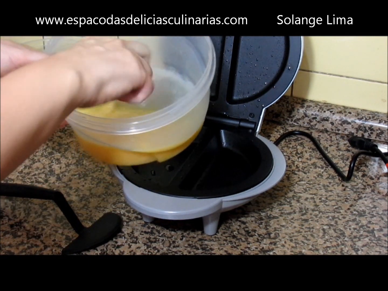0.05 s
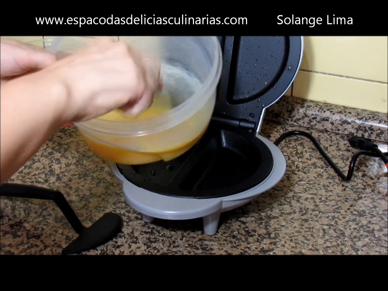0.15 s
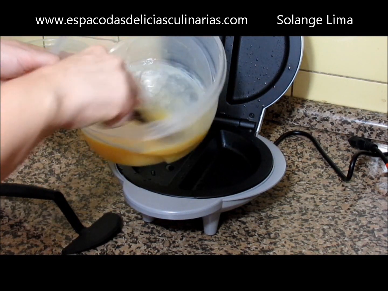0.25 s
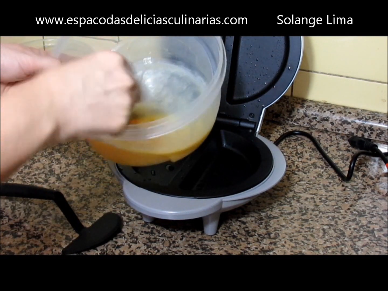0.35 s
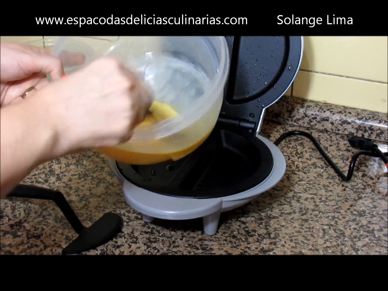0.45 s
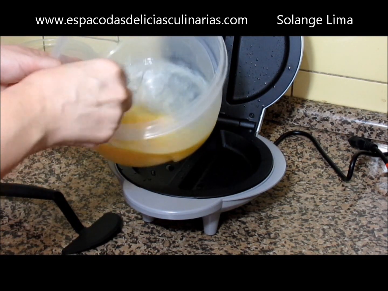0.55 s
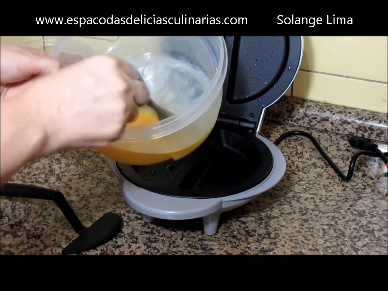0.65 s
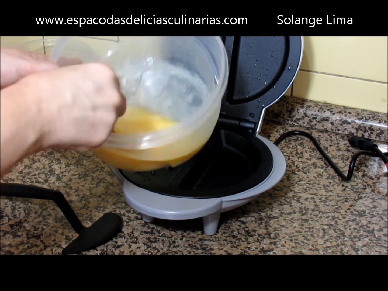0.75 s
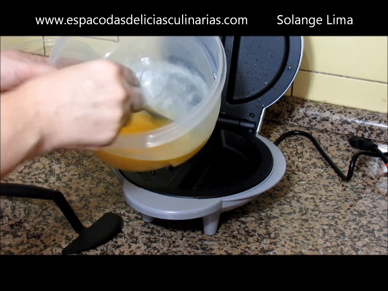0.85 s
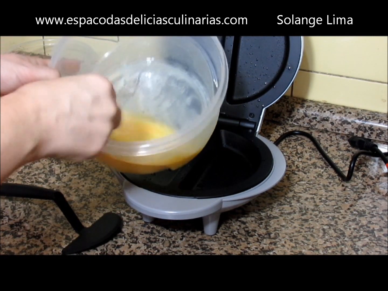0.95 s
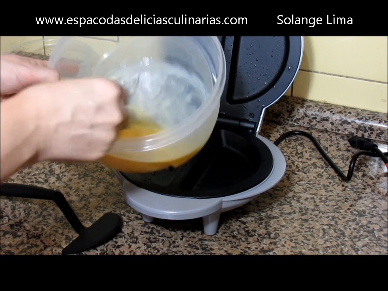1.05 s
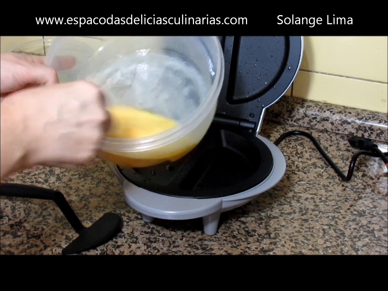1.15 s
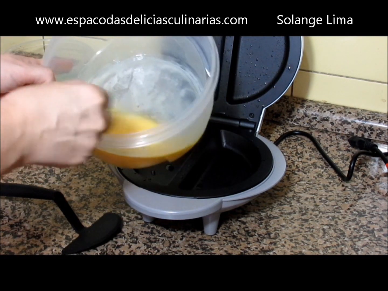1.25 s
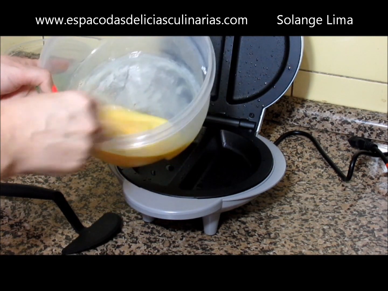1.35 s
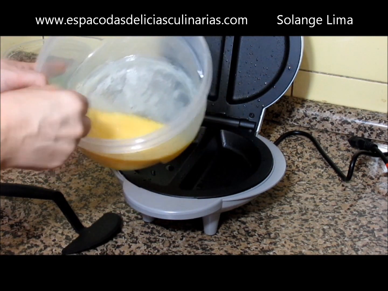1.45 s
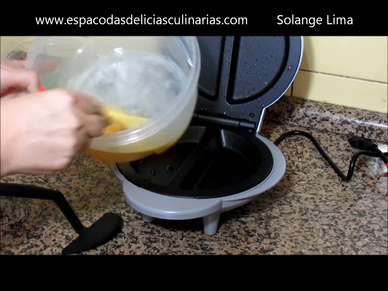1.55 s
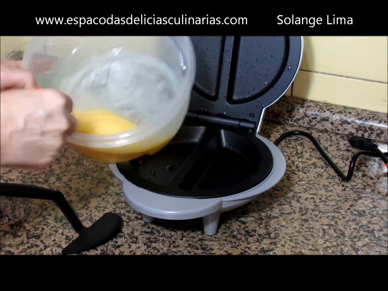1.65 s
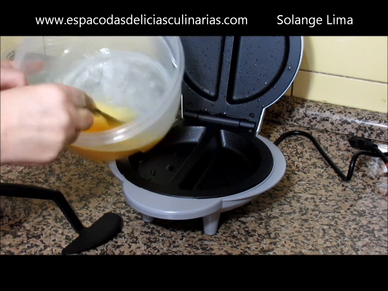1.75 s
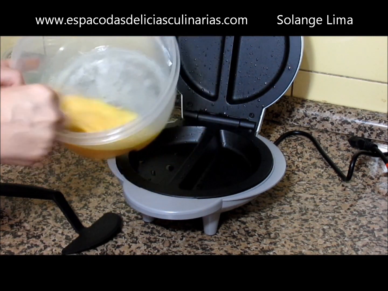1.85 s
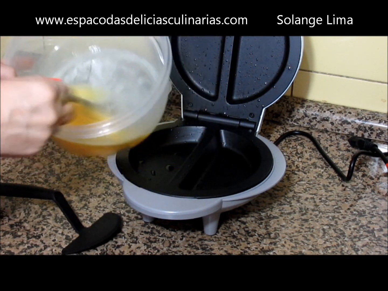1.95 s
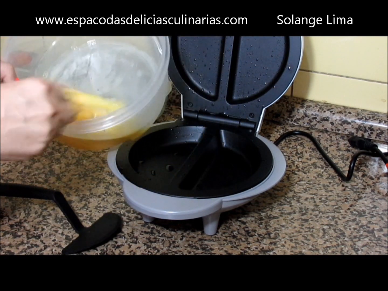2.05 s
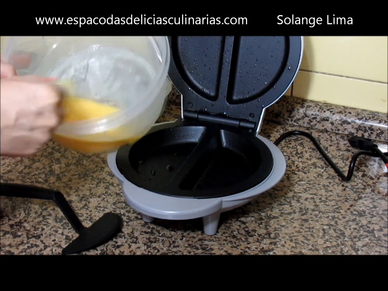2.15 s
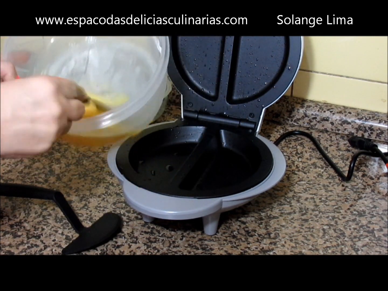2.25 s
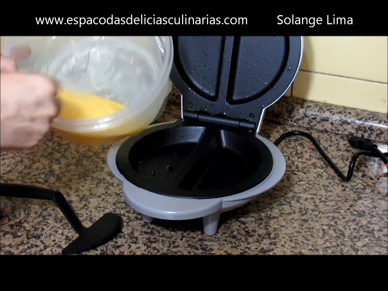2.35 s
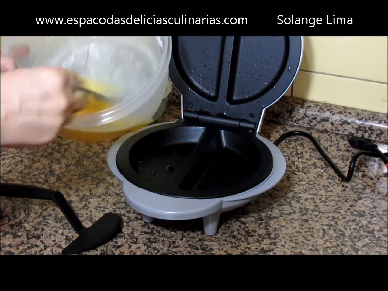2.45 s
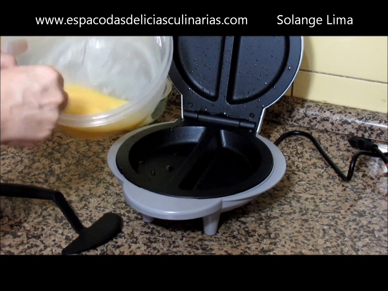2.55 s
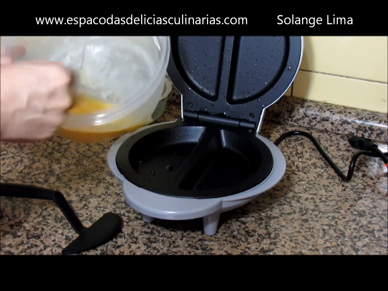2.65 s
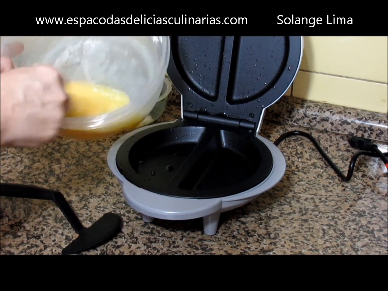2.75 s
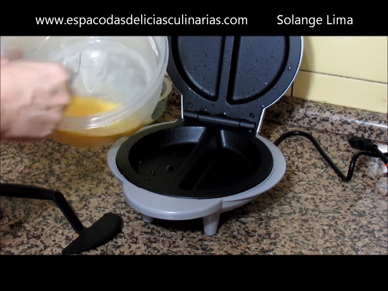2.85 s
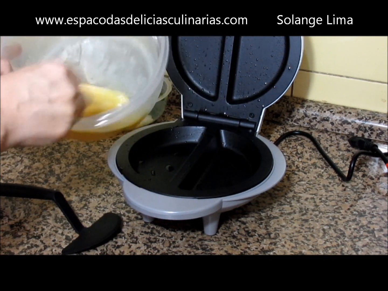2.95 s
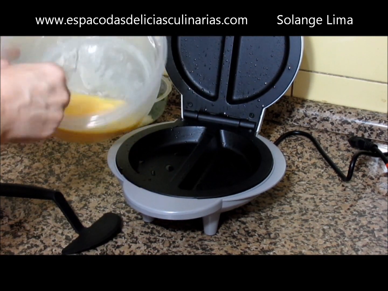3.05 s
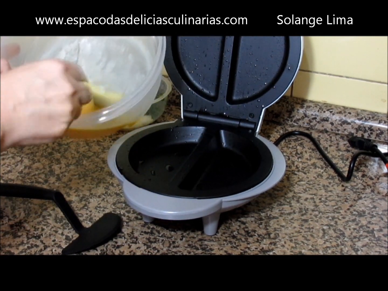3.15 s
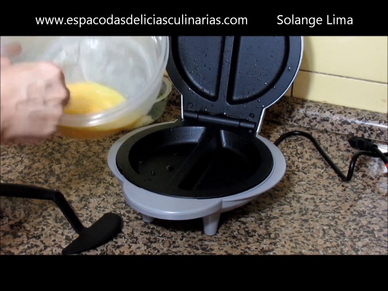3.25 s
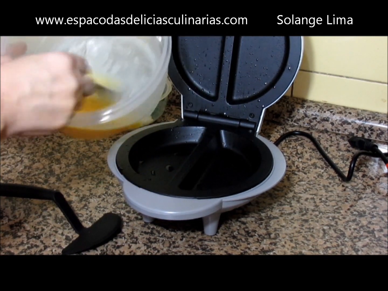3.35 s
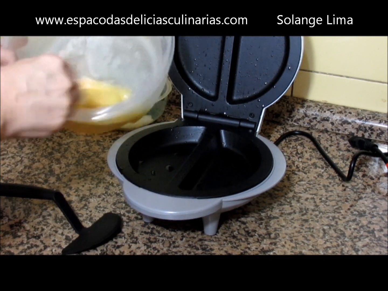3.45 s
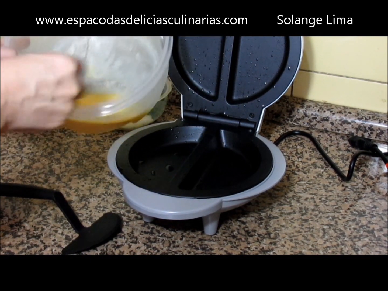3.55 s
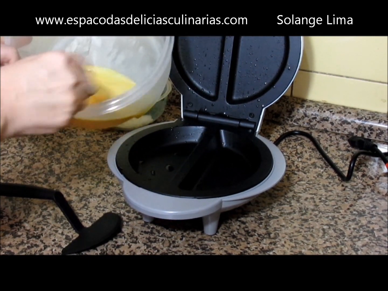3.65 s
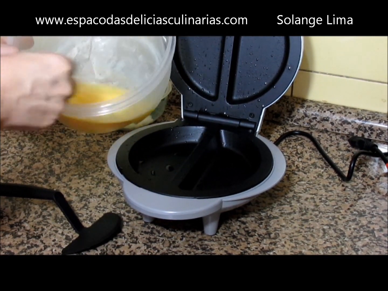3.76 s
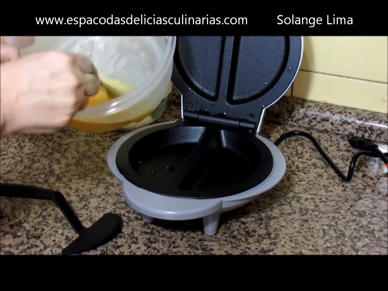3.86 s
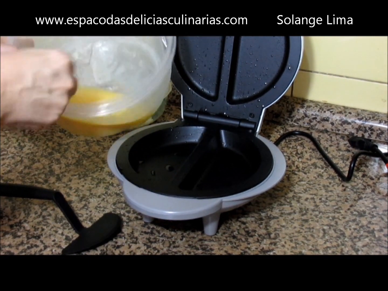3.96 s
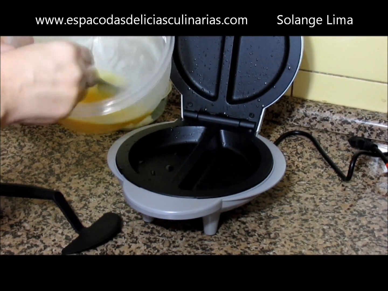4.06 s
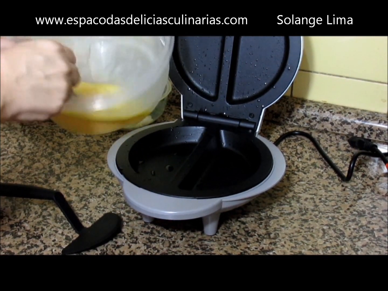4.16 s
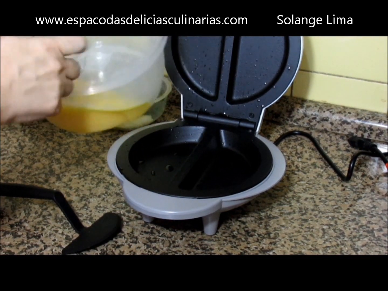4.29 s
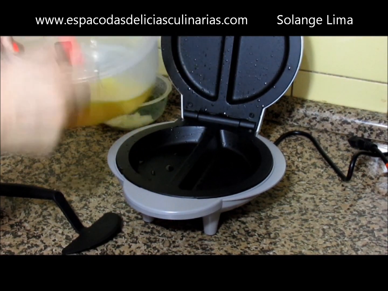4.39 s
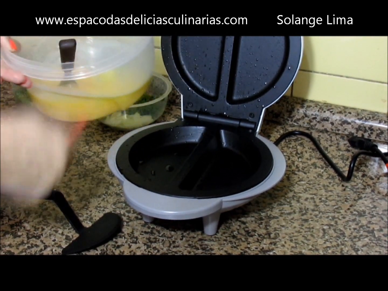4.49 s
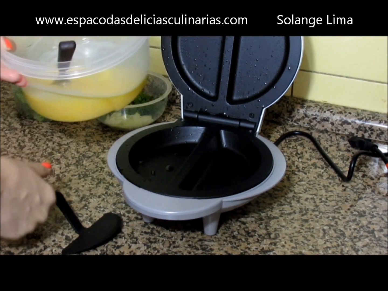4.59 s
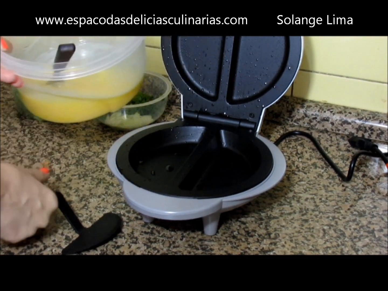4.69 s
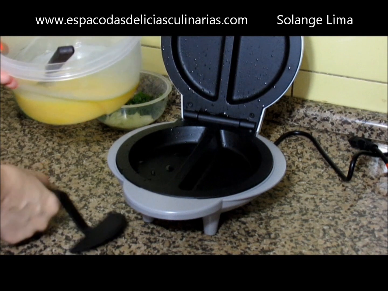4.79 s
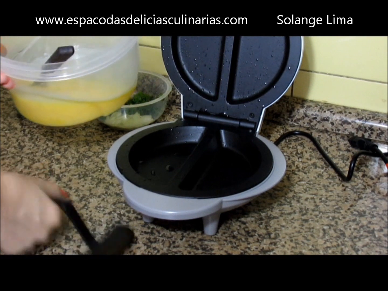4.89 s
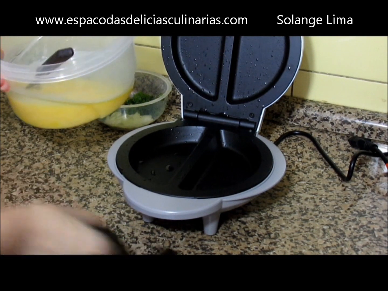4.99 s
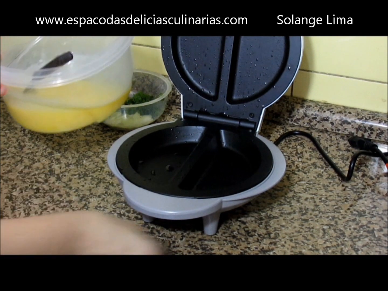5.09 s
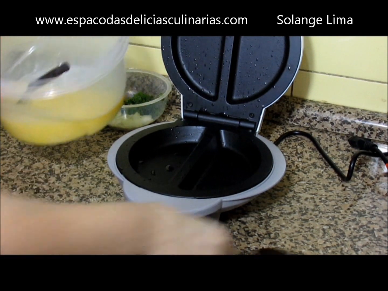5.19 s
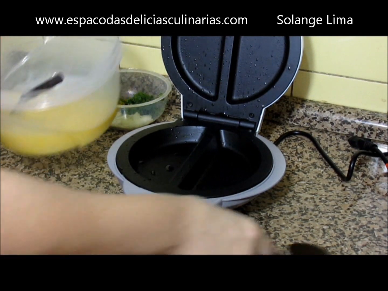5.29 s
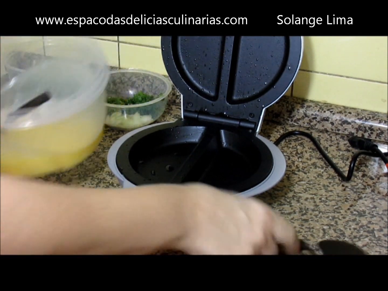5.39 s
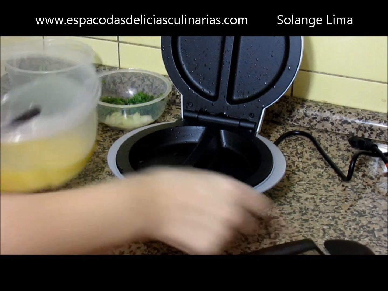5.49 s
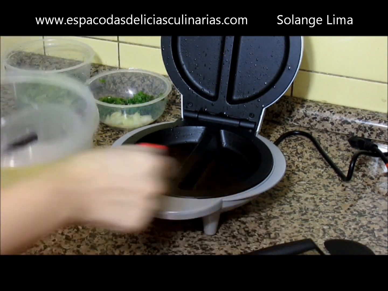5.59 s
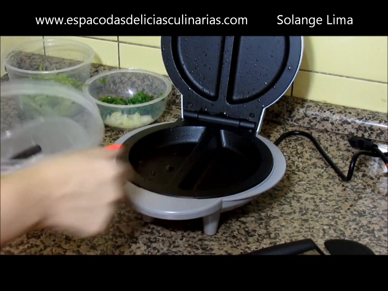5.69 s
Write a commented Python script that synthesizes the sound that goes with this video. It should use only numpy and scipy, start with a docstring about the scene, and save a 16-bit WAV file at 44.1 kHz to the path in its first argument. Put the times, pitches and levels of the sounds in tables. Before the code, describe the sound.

Fast, wet egg whisking against a plastic bowl in an echoing kitchen stops, followed by scrapes and hard knocks of a kitchen turner.

```python
"""In a hard-walled kitchen, close to the camera, a spoon beats raw eggs in a thin plastic bowl.
Each stroke splashes into the egg (shaped noise and sharp drops), slaps it and knocks the wall (ringing modes);
egg swirls and clucks between blows. Later a turner is picked up, dragged over the stone counter and laid down:
rattles, ringing modes and grainy noise. Echoes and standing waves follow every blow, over the quiet of the room."""
import sys
import numpy as np
from scipy import signal
from scipy.fft import rfft, irfft, next_fast_len
from scipy.io import wavfile
from scipy.ndimage import uniform_filter1d

SR = 44100
rng = np.random.default_rng(int(sys.argv[2]) if len(sys.argv) > 2 else 0)


def unload_audio(sound):
    """Save the sound as a 16-bit wav file, at the path given as the first command line argument."""
    columns = np.transpose(np.atleast_2d(sound))
    # keep every value between -1 and 1, then stretch to whole-number steps
    steps = np.round(np.clip(columns, -1, 1) * 32767)
    wavfile.write(sys.argv[1], SR, steps.astype(np.int16))


N = 252693
SIZE = next_fast_len(N + SR)  # room for the scene and a second of echoes
HZ = np.fft.rfftfreq(SIZE, 1 / SR)
# Levels of sounds on the counter are source levels, before the path to the microphone.


def gain_of(db):
    """Amplitude factor of a level in dB."""
    return 10 ** (np.asarray(db) / 20)


def evened(x):
    """Scales x to an RMS of one."""
    return x / np.sqrt(np.mean(x ** 2) + 1e-20)


def read(points, hz):
    """Reads a curve of (pitch_hz, value) rows, straight between points on a log pitch scale."""
    point_hz, value = np.transpose(points)
    return np.interp(np.log(hz + 1), np.log(point_hz + 1), value)


def level(curve):
    """Gain over time from (start_s, level_db) rows, silent outside them."""
    s, db = np.transpose(curve)
    return gain_of(np.interp(np.arange(N) / SR, s, db, left=-120, right=-120))


def add(mix, s, sound):
    """Lays a sound into the mix at s seconds, cut at the end of the mix."""
    part = mix[round(s * SR):][:len(sound)]
    part += sound[:len(part)]


def coloured(x, db):
    """Gives x the spectrum db(hz) through a causal, minimum-phase filter."""
    log_gain = np.maximum(db(abs(np.fft.fftfreq(4096, 1 / SR))), -100) * np.log(10) / 20
    taps = np.fft.ifft(np.exp(np.conj(signal.hilbert(log_gain)))).real[:2048]
    return signal.oaconvolve(x, taps)[:len(x)]


def burst(length_s, rise_s=0.0004):
    """A dying rattle of tiny contacts, spread evenly over all pitches; the shape is applied one and a half times."""
    t = np.arange(4096) / SR
    noise, unevenness = rng.standard_normal((2, len(t)))
    shape = (1 - np.exp(-t / rise_s)) * np.exp(-t / length_s)
    spectrum = rfft(noise * np.exp(0.72 * unevenness) * shape)
    even = irfft(spectrum / np.sqrt(uniform_filter1d(abs(spectrum) ** 2, size=9)))
    return even * np.sqrt(shape + 1e-9)


def peaked(x, db):
    """Sets the RMS of the loudest 6 ms to db."""
    return gain_of(db) * x / np.sqrt(np.max(uniform_filter1d(x ** 2, size=256)))


def grains(per_s, spread_db):
    """Noise broken into short grains of uneven size."""
    starts = rng.random(N) < per_s / SR
    size = gain_of(spread_db * np.minimum(rng.exponential(1, N), 4)) * starts
    return evened(rng.standard_normal(N) * (0.99 + signal.lfilter([1], [1, -.99], size)))


def swell(start, end, rise_s, db, fade_db_per_s):
    """Gain that rises quickly at start, fades steadily and stops at end."""
    t = np.arange(N) / SR
    edges = np.clip((t - start) / rise_s, 0, 1) ** 2 * np.clip((end - t) / rise_s, 0, 1)
    return edges * gain_of(db - fade_db_per_s * np.maximum(t - start - rise_s, 0))


# left-right likeness of diffuse sound: pitch_hz, likeness (1 same, 0 unrelated, -1 opposite)
DIFFUSE_SAME = [(25, -0.9), (60, -0.93), (130, -0.85), (290, -0.28), (640, -0.38), (1410, -0.23),
                (3100, 0.92), (6820, 0.95), (15000, -0.2)]
# left-right balance of diffuse sound: pitch_hz, left_minus_right_db
DIFFUSE_BALANCE = [(60, -1), (380, 4.5), (1300, 1.5), (5000, 0)]


def diffuse(a, b, likeness=DIFFUSE_SAME):
    """Blends two unrelated spectra into the pair that the microphone ports hear."""
    same = np.clip(read(likeness, HZ), -1, 1)
    half = gain_of(read(DIFFUSE_BALANCE, HZ) / 2)
    return np.array([a * half, (same * a + np.sqrt(1 - same ** 2) * b) / half])


# spectrum of the quiet room: pitch_hz, level_db (per Hz, relative)
AIR_COLOUR = [(12, -42), (20, -10.5), (50, -6), (91, -13), (123, -5), (146, -9), (187, -5), (301, -13),
              (328, -0.5), (357, -9.5), (399, -8.5), (434, -9.5), (759, -17), (1090, -17), (3160, -35.5),
              (16000, -34.5)]
AIR_DB = -44


def room_air():
    """The quiet of the room: steady diffuse noise in the colour of the room."""
    pair = diffuse(*rfft(rng.standard_normal((2, SIZE))))
    air = irfft(pair * gain_of(read(AIR_COLOUR, HZ)), SIZE)[:, :N]
    return gain_of(AIR_DB) * evened(air)


# the kitchen still rings from an earlier blow: pitch_hz, level_db (before the side gains), t60_s
RINGING = [(295, -41.5, 1.9), (338, -44, .6), (443, -49, 0.86), (492, -48, 1.3), (630, -59, .8),
           (825, -54, 0.93)]


def ringing():
    """Dying standing waves, each a decaying sine, stronger on the left."""
    t, tones = np.arange(N) / SR, 0
    for hz, db, t60 in RINGING:
        tones = tones + gain_of(db - 60 * t / t60) * np.sin(2 * np.pi * (hz * t + rng.random()))
    return tones * gain_of([[4.], [-1.5]])  # left, right dB


# egg swirling round the bowl between blows: start_s, level_db
SWIRL = [(0.0, -44), (0.14, -50.5), (0.3, -73), (0.51, -71), (0.62, -51.5), (1.43, -50), (1.76, -43),
         (2.02, -43), (2.09, -44.5), (3.55, -47.5), (4.29, -49), (4.4, -65)]
# spectrum of the swirl: pitch_hz, level_db (per Hz, relative)
SWIRL_COLOUR = [(47, -67), (80, -14.5), (304, -13), (451, -9.5), (587, 0.5), (669, -16), (1290, -6),
                (2330, -15.5), (15000, -38.5)]


def swirl():
    """Egg running round the bowl: coloured grains of noise that swell and sink."""
    return level(SWIRL) * evened(coloured(grains(300, 5.4), lambda hz: read(SWIRL_COLOUR, hz)))


BLOW_RISE_S = 0.002998
THUD_DB, HOLLOW_THUD_DB = 6.5, -2  # beside the sum of the ringing modes
THUD_CYCLES, THUD_LAG_CYCLES, HOLLOW_LAG_CYCLES = 0.59, 1.446, 1.737
CONTACTS_PER_S, CONTACTS_S = 1000, 0.014  # chatter rate and its decay time


def thud(t, hz, lag_cycles, db):
    """The wall dents once under the push and springs back: a cosine in a short bell envelope."""
    turns = hz * t - lag_cycles
    return gain_of(db) * np.cos(2 * np.pi * turns) * np.exp(-(turns / THUD_CYCLES) ** 2)


def chatter(t, rise):
    """The spoon edge chatters on the wet wall: random pulses and one firm contact."""
    chance, size = rng.random((2, len(t)))
    contacts = (chance < CONTACTS_PER_S / SR) * (2 * size - 1) * np.exp(-t / CONTACTS_S) * rise
    contacts[round(BLOW_RISE_S * SR)] += .45
    return contacts


# modes of the bowl: part (0 body, 1 hollow, 2 wall), pitch_hz and level_db (both nominal, shifted at each blow), t60_s
BOWL = [(0, 175, 0, 0.028), (0, 212, -2, 0.021), (0, 297, -2.5, 0.015), (0, 380, 4, 0.032),
        (0, 480, 3, 0.043), (1, 634, 0.5, 0.033), (1, 1453, -18, 0.034), (2, 860, -3, 0.0049),
        (2, 1006, 2, 0.0097), (2, 1296, -1.5, .011), (2, 1482, -1, 0.014), (2, 1780, -2.5, 0.0065),
        (2, 1947, -2, 0.017)]
# spoon and egg hit the bowl: start_s, wall_db, then beside the wall: body_db, hollow_db, tick_db;
# then the pitch of the struck spot in each part: body_hz, hollow_hz, wall_hz
BLOWS = [(0.188, -31, 5, 1.5, -8, 273, 525, 1300), (0.444, -25, -1, -7, -13, 303, 580, 1250),
         (0.686, -33.5, 6.5, -15, -3, 306, 650, 1120), (0.693, -25, 0, -13, -12.5, 318, 580, 990),
         (0.907, -24, -0.5, -1.5, -7.5, 339, 570, 1000), (1.129, -28, 0, -7, -12, 222, 567, 1300),
         (1.164, -28, -3, -5, -8, 300, 575, 1300), (1.173, -27.5, -9, 0.5, -13, 355, 595, 1300),
         (1.35, -28.5, -15, -7, -20, 400, 580, 1360), (1.394, -27.5, 0.5, -9, -9, 397, 554, 1230),
         (1.584, -29, -4, -4.5, -7, 187, 530, 1380), (1.635, -25, -1, 3.5, -10.5, 396, 528, 1330),
         (1.819, -26.5, 4.5, -10, -12, 360, 520, 1190), (1.855, -25, 3, 4.5, -5.5, 397, 548, 1720),
         (1.864, -30.5, 1, 0, -12, 443, 556, 1400), (1.873, -30, -6, -1, -20, 350, 785, 900),
         (2.051, -27, 2, -4, -15, 360, 526, 1290), (2.1, -25.5, -1, 1, -10.5, 476, 565, 1480),
         (2.116, -37.5, -11, 3, -20, 450, 594, 1000), (2.286, -25, -4.5, -4, -11, 229, 560, 1420),
         (2.322, -25.5, 2.5, -7, -6, 404, 520, 1400), (2.328, -25, -12, -4.5, -20, 386, 570, 1810),
         (2.508, -22, -5, -3.5, -29, 360, 570, 1180), (2.545, -21, -4, 3, -9, 376, 571, 1220),
         (2.729, -36, -6, -6, -12, 404, 510, 1450), (2.742, -26, -1.5, 1, -22, 270, 556, 1250),
         (2.767, -20, -6, -1, -9, 430, 532, 1470), (2.774, -22.5, -7, -4, -26, 410, 540, 1480),
         (2.959, -25.5, -1, -2, -9.5, 383, 556, 1200), (3.0005, -23.5, -5, 4, -9, 375, 560, 1300),
         (3.187, -25, -4.5, -0.5, -17, 249, 550, 1000), (3.227, -22.5, -5.5, -3, -12, 370, 543, 1230),
         (3.232, -24.5, -12, -0.5, -11, 410, 560, 1400), (3.41, -27.5, -3.5, -7, -5.5, 267, 590, 1400),
         (3.464, -26.5, -6, 3, -10, 300, 565, 1300), (3.608, -42.5, 8, 14, -8, 366, 563, 1000),
         (3.648, -23.5, -2.5, -1, -14, 388, 560, 985), (3.694, -21.5, -6.5, 1.5, -11.5, 385, 560, 1030),
         (3.872, -26, -1.5, -15, -12, 292, 595, 1110), (3.925, -24, -6, 0.5, -10.5, 314, 560, 1150),
         (4.085, -24.5, -0.5, -8, -14.5, 348, 585, 1100), (4.311, -49, 7, 8, -12, 350, 570, 1000)]


def blow(s, db, body_db, hollow_db, tick_db, body_hz, hollow_hz, wall_hz):
    """A soft push dents the bowl and rings its low modes and hollow; the spoon edge chatters on the wall."""
    t = np.arange(4096) / SR
    rise = 1 - np.exp(-t / BLOW_RISE_S)
    parts = np.zeros((3, len(t)))  # body, hollow, wall
    for (part, hz, mode_db, t60), (spot, detune) in zip(BOWL, rng.standard_normal((len(BOWL), 2))):
        if part == 1:
            turns = hz * hollow_hz / 590 * (t + 0.5 * t ** 2)  # the pocket of air shrinks: pitch rises
        else:
            turns = hz * (1 + 0.034 * detune) * t
            # modes near the struck spot's pitch ring most
            loss_db, spot_hz = (11, wall_hz) if part else (8.4, body_hz)
            mode_db -= loss_db * abs(np.log2(hz / spot_hz))
        parts[int(part)] += gain_of(mode_db + 2.3 * spot - 60 * t / t60) * np.sin(2 * np.pi * turns)
    parts[:2] *= rise  # the egg cushions the push
    parts[0] -= thud(t, body_hz, THUD_LAG_CYCLES, THUD_DB)
    parts[1] -= thud(t, hollow_hz, HOLLOW_LAG_CYCLES, HOLLOW_THUD_DB)
    parts[2] = signal.fftconvolve(parts[2], chatter(t, rise))[:len(t)]
    tick_colour = [(1500, -32.5), (2600, -1.5), (4000, -3.5), (9000, -8.5), (15000, -16.5)]
    tick = coloured(burst(0.0055, BLOW_RISE_S), lambda hz: read(tick_colour, hz))
    sounds, beside_db = [*parts, tick], [body_db, hollow_db, 0, tick_db]
    return sum(peaked(sound, db + d) for sound, d in zip(sounds, beside_db))


SPLASH_RISE = .2  # share of the length
POPS_PER_S, POP_DB = 110, 6  # pops beside the spray, before colouring
# egg spatters as the spoon cuts in: start_s, level_db, centre_hz, length_s (given to burst), narrow_db (per octave)
SPLASHES = [(0.188, -37, 5800, 0.0059, 3), (0.4445, -36, 7700, 0.0099, 18), (0.682, -38.5, 8440, .012, 9),
            (0.852, -39, 5030, .0092, 8), (1.056, -45, 5460, 0.017, 4), (1.1186, -35, 6570, 0.014, 21),
            (1.272, -47, 11000, .008, 18), (1.3464, -28, 8500, 0.0078, 15),
            (1.3517, -29.5, 8500, 0.001, 16), (1.55, -45, 12500, 0.014, 14), (1.569, -33.5, 9000, 0.015, 1),
            (1.76, -46, 8000, 0.011, 3), (1.79, -40, 5730, 0.02, 6), (1.82, -37, 9400, 0.014, 14),
            (2.049, -35.5, 6800, 0.016, 7), (2.2598, -36.5, 6500, 0.017, -1), (2.278, -33, 9350, .014, 16),
            (2.2795, -30.5, 2640, 0.0031, 12), (2.483, -32, 9600, 0.0085, 5),
            (2.5053, -27.5, 5140, .0088, 16), (2.74, -37, 9000, 0.014, 8), (2.9206, -44, 9000, 0.013, -2),
            (2.94, -34.5, 7250, .012, 9), (2.961, -35.5, 8100, 0.0079, 17), (3.16, -43, 10000, 0.01, 9),
            (3.186, -32, 9900, 0.011, 3), (3.386, -34, 9900, 0.014, -2.5), (3.409, -44, 5800, 0.0046, 4),
            (3.6495, -36.5, 8240, 0.0098, 13), (3.856, -44.5, 8270, .01, 2),
            (3.8725, -35.5, 9400, 0.0068, 11), (4.074, -38.5, 9800, 0.023, 6)]


def splash(db, centre_hz, length_s, narrow_db):
    """Fine droplets: a rattle with a few sharp pops, filtered into a treble hump."""
    spray = burst(length_s, SPLASH_RISE * length_s)
    t = np.arange(len(spray)) / SR
    chance, size = rng.random((2, len(spray)))
    pops = (chance < POPS_PER_S / SR) * (2 * size - 1) * np.exp(-t / (2 * length_s))
    spray = peaked(spray, 0) + gain_of(POP_DB) * pops
    return peaked(coloured(spray, lambda hz: -narrow_db * abs(np.log2((hz + 1) / centre_hz))), db)


DROP_DB, DROP_S, DROP_NARROW_DB = 3.5, .0003, 14  # lift of all drops, decay s, narrowness dB an octave
# single drops burst sharply: start_s, level_db (peak, before the lift DROP_DB), centre_hz
DROPS = [(0.1882, -36, 8400), (0.4452, -35, 8900), (0.6855, -32, 9600), (1.1121, -33, 8300),
         (1.1225, -30, 6700), (1.3484, -22, 8800), (1.3547, -21, 9200), (1.5596, -37, 12700),
         (1.5801, -23, 11300), (1.5897, -31, 10000), (1.6356, -33, 7900), (1.6416, -30, 7500),
         (1.788, -35, 8100), (1.8257, -29, 9900), (1.8558, -22, 8300), (2.0574, -29, 8800),
         (2.2599, -34, 11100), (2.2659, -34, 10100), (2.2802, -28, 9200), (2.2862, -23, 10700),
         (2.4846, -27, 10200), (2.4896, -29, 10100), (2.7477, -26, 10100), (2.7678, -33, 7200),
         (2.7739, -30, 8200), (2.922, -31, 10300), (2.9483, -30, 8700), (2.9648, -26, 9600),
         (3.0009, -30, 7800), (3.0066, -28, 6900), (3.1603, -34, 9900), (3.1664, -27, 9800),
         (3.1895, -31, 10100), (3.1958, -24, 11800), (3.3879, -35, 11300), (3.3941, -33, 10300),
         (3.4181, -27, 9900), (3.6503, -30, 7800), (3.702, -32, 7300), (3.8561, -39, 9500),
         (4.0759, -36, 9600)]


def drop(db, centre_hz):
    """One sharp treble tick: a very short noise burst filtered round its centre pitch."""
    t = np.arange(1024) / SR
    noise = rng.standard_normal(len(t)) * np.exp(-t / DROP_S)
    tick = coloured(noise, lambda hz: -DROP_NARROW_DB * abs(np.log2((hz + 1) / centre_hz)))
    return gain_of(db + DROP_DB) * tick / abs(tick).max()


# pockets of air cluck in the egg: start_s, level_db, pitch_hz (at the start), t60_s, glide (share of pitch per s)
CLUCKS = [(0.618, -23.5, 593, .028, 0.5), (0.619, -41, 1440, .04, -1), (0.632, -26, 610, .055, 0.5),
          (0.631, -43, 1500, 0.054, -4), (0.651, -33, 630, .07, 0.5), (0.67, -31, 635, .04, -1),
          (0.672, -43, 1300, 0.033, 0), (1.053, -43, 1440, 0.036, -2.8), (1.787, -32.5, 776, 0.033, -2.8),
          (1.788, -35.5, 1524, .04, -5), (1.882, -30, 830, 0.045, -2.8), (2.029, -32, 1500, 0.042, -1.5),
          (2.125, -30.5, 1470, .06, -1.5), (2.483, -37, 1480, .03, -2)]


def cluck(db, hz, t60, glide):
    """A pocket of air: a short gliding tone with a soft start."""
    t = np.arange(4096) / SR
    tone = np.sin(2 * np.pi * hz * (t + glide * t ** 2 / 2))
    return peaked((1 - np.exp(-t / 0.0021)) * gain_of(-60 * t / t60) * tone, db)


JOLT_S, JOLT_DB, JOLT_RISE_S, JOLT_FADE_DB_PER_S = 1.834, -42, 0.025, 71


def jolt():
    """The camera is jolted once: a fading rumble of low noise at the microphone."""
    colour = [(15, -20), (40, -11), (70, 0), (120, -6), (300, -80)]  # pitch_hz, level_db
    pair = diffuse(*rfft(rng.standard_normal((2, SIZE))), [(20, -.5), (100, -.3)])
    rumble = irfft(pair * gain_of(read(colour, HZ)), SIZE)[:, :N]
    return swell(JOLT_S, JOLT_S + 1, JOLT_RISE_S, JOLT_DB, JOLT_FADE_DB_PER_S) * evened(rumble)


KNOCK_S = 0.015  # length given to burst
# spectrum of the turner's rattle before the brightness tilt: pitch_hz, level_db (per Hz, relative)
TURNER = [(59, -29), (100, -11), (180, 2), (300, -9), (450, -6), (620, -3), (748, -0.5), (1160, -4.5),
          (1290, -7.5), (1810, -6), (2370, -19), (2990, -19), (15000, -46)]
# ringing modes of the turner: pitch_hz, t60_s
TURNER_MODES = [(620, .09), (755, 0.065), (950, 0.09), (1090, .07), (1170, 0.053), (1420, 0.059),
                (1610, 0.028), (1770, 0.032), (1950, 0.055)]
# the turner knocks the counter: start_s, level_db, bright_db (per octave), ring_db (beside the rattle), ring_hz
KNOCKS = [(4.689, -50, 8, -12, 900), (4.713, -33, -1.5, -3, 790), (4.866, -36, -1.5, 2.5, 950),
          (4.969, -26, 5.5, -5, 860), (5.064, -30, 2.5, -6, 610), (5.078, -34.5, 0.5, -6, 620),
          (5.294, -20.5, 0, -5, 700), (5.302, -27, 0, -6, 1110), (5.318, -27, -1, -8, 950),
          (5.335, -24.5, 1, -1, 746), (5.351, -27.5, 1.3, -4, 930), (5.375, -32, -2, -4, 800),
          (5.4, -33, -0.5, -6, 750), (5.43, -34.5, -2, -4, 705)]


def knock(db, bright_db, ring_db, ring_hz):
    """A hard, rattling contact with the colour of the turner, and the ring of modes near the struck spot."""
    t = np.arange(4096) / SR
    ring = np.zeros(len(t))
    for hz, t60 in TURNER_MODES:
        fade = gain_of(-12 * abs(np.log2(hz / ring_hz)) - 60 * t / t60)
        ring += fade * np.sin(2 * np.pi * (hz * t + rng.random()))
    ring *= 1 - np.exp(-t / 0.0016)
    rattle = coloured(burst(KNOCK_S), lambda hz: read(TURNER, hz) + bright_db * np.log2((hz + 100) / 1000))
    return peaked(rattle, db) + peaked(ring, db + ring_db)


DRAG_RISE_S = .016
# spectrum of turner on stone: pitch_hz, level_db (per Hz, relative)
SLIDE_COLOUR = [(59, -38), (100, -4), (310, -6), (352, -15), (607, -11), (748, -17), (1000, -11),
                (9460, -23), (15000, -37)]
# pulls of the turner, each with a quick start; the first and last fade, the middle one stays level:
# start_s, end_s, level_db, fade_db (per s)
DRAGS = [(4.704, 4.8, -40, 300), (4.838, 4.971, -44.5, 1), (4.961, 5.296, -35.5, 43)]


def drags():
    """The turner is dragged on stone: coloured grains of noise under the gain of each pull."""
    pulls = sum(swell(start, end, DRAG_RISE_S, db, fade) for start, end, db, fade in DRAGS)
    return pulls * evened(coloured(grains(300, 2.8), lambda hz: read(SLIDE_COLOUR, hz)))


def near():
    """Everything that sounds on the counter, summed in mono."""
    mix = np.zeros(N)
    for row in BLOWS:
        add(mix, row[0], blow(*row))
    for table, play in ((SPLASHES, splash), (DROPS, drop), (CLUCKS, cluck), (KNOCKS, knock)):
        for s, *row in table:
            add(mix, s, play(*row))
    return mix + swirl() + drags()


# balance of the direct sound: pitch_hz, left_minus_right_db
NEAR_BALANCE = [(60, 14), (200, 10.5), (380, 10.5), (700, 1), (1300, 1.5), (2400, -0.5), (15000, 1.5)]
# phase of the direct sound: pitch_hz, left_lead_radians
NEAR_PHASE = [(100, 0.11), (340, 0.33), (600, -0.95), (1120, -0.83), (2930, -0.64), (7000, 0.57),
              (15000, 0.86)]


def direct_path():
    """Left and right response of the short path: level and phase differ between the microphone ports."""
    half = gain_of(read(NEAR_BALANCE, HZ) / 2) * np.exp(.5j * read(NEAR_PHASE, HZ))
    return np.array([half, 1 / half])


# left-right likeness of the echoes: pitch_hz, likeness (1 same, 0 unrelated, -1 opposite)
ECHO_SAME = [(60, -0.85), (130, 0.2), (290, 0.91), (640, 0.5), (1410, 0.36), (3100, 0.86), (6820, 0.99),
             (15000, -0.19)]
# standing waves between the walls: pitch_hz, level_db (of the whole ring), t60_s
KITCHEN_MODES = [(115.6, -20.5, 0.93), (175, -24.5, 0.47), (204, -29, .5), (302, -25, 0.78),
                 (325.2, -26.5, 0.41), (350, -25, 0.59), (385.7, -22.5, 0.41), (490, -24, 0.31),
                 (558, -31, .35), (585, -31, 0.26), (630, -35, .3)]


def standing():
    """Response of the standing waves between the walls: decaying sines."""
    t, tail = np.arange(SR) / SR, 0
    for hz, db, t60 in KITCHEN_MODES:
        wave = gain_of(-60 * t / t60) * np.sin(2 * np.pi * (hz * t + rng.random((2, 1))))
        tail = tail + gain_of(db) * wave / np.linalg.norm(wave[0])
    return diffuse(*rfft(tail, SIZE), ECHO_SAME)


EARLY_DB, EARLY_S = -1.5, 0.023  # counter and tiles close by strengthen the first echoes
# decay of the echoes, apart from the early lift: pitch_hz, t60_s
KITCHEN_T60 = [(100, 0.51), (300, 0.43), (700, 0.58), (1500, 0.62), (3000, 0.59), (7000, 0.62),
               (14000, 0.48)]


def kitchen():
    """Response of the hard walls: sparse echoes dying band by band."""
    taps = np.zeros((2, SR))
    at = np.arange(160, SR - 10, 10) + rng.integers(0, 10, (2, (SR - 161) // 10))  # one in every 10 samples
    np.put_along_axis(taps, at, rng.choice([-1., 1.], at.shape), 1)
    early = 1 + gain_of(EARLY_DB) * np.exp(-np.arange(SR) / SR / EARLY_S)
    hz, t, bands = signal.stft(taps * early, SR, nperseg=256)
    fade = gain_of(-60 * t / read(KITCHEN_T60, hz)[:, None])
    tail = signal.istft(bands * fade, SR, nperseg=256)[1][:, :SR]
    return diffuse(*rfft(tail / np.linalg.norm(tail[0]), SIZE), ECHO_SAME)


KITCHEN_DB = 1.3
# rates of the sharing between echo responses: rate_hz
SHARING_HZ = [.9, 7, 16, 29]


def shared_echoes(sound):
    """Slow and fast sines share sound between random echo responses: the reverberation is smooth and untuned."""
    t, heard = np.arange(N) / SR, 0
    for hz in SHARING_HZ:
        for share in (np.cos(2 * np.pi * hz * t), np.sin(2 * np.pi * hz * t)):
            heard = heard + rfft(sound * share, SIZE) * kitchen()
    return gain_of(KITCHEN_DB) * heard / np.sqrt(len(SHARING_HZ))


def scene():
    """The counter heard directly and through the kitchen, with the old ringing, the room's quiet and the jolt."""
    sound = near()
    spectrum = rfft(sound, SIZE)
    heard = spectrum * (direct_path() + standing()) + shared_echoes(sound)
    # small things send out little bass; above 150 Hz an even -6 dB
    small = gain_of(read([(30, -36), (90, -16), (150, -6)], HZ))
    return irfft(heard * small, SIZE)[:, :N] + ringing() + room_air() + jolt()


EDGE_HZ = 15750


def record(dry):
    """The microphone drops the deep bass; then the band limit takes off the top treble."""
    thin = signal.sosfilt(signal.butter(2, 20, "high", fs=SR, output="sos"), dry)
    low_pass = signal.firwin(511, EDGE_HZ, window=("kaiser", 9), fs=SR)
    return signal.oaconvolve(thin, low_pass[None], "same")


dry = scene()
out = record(dry)
unload_audio(out)
```